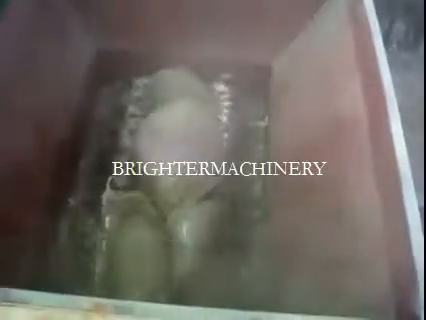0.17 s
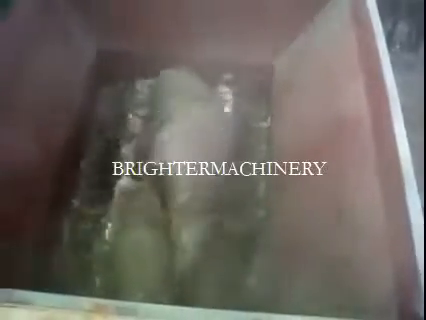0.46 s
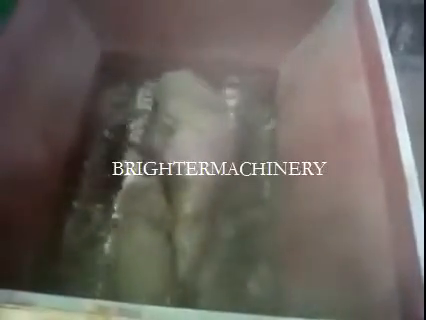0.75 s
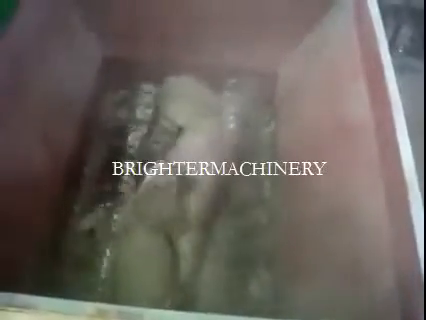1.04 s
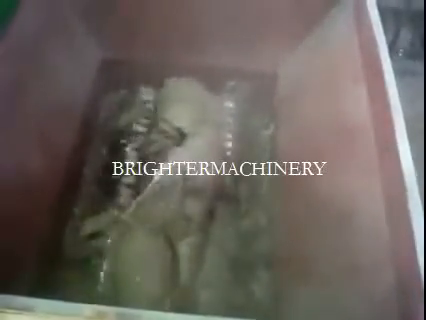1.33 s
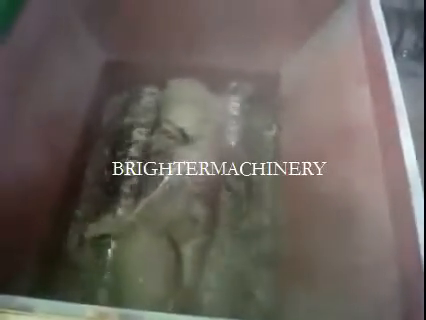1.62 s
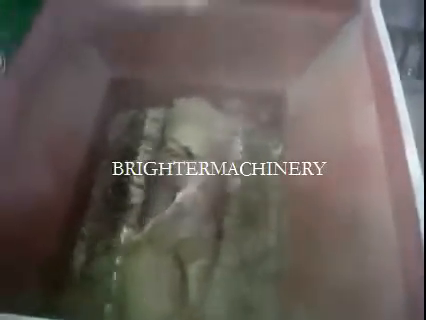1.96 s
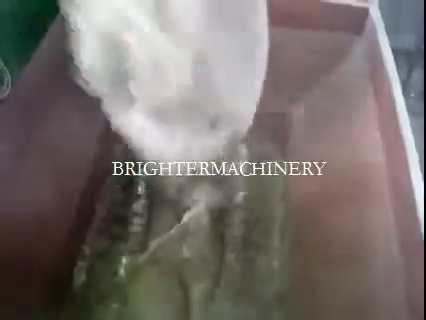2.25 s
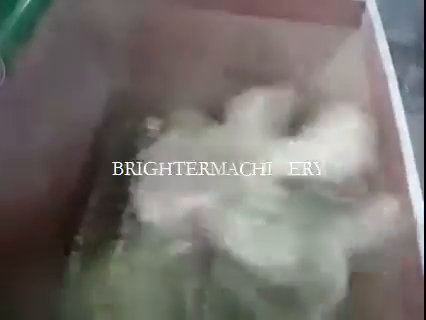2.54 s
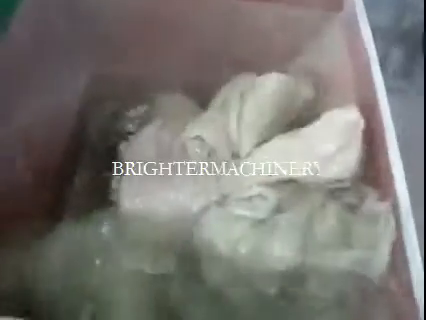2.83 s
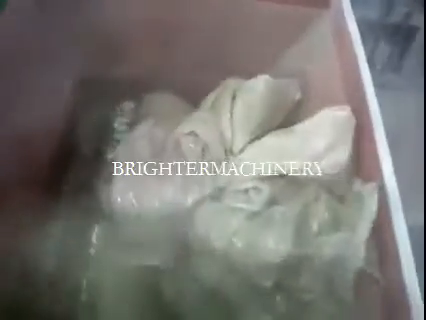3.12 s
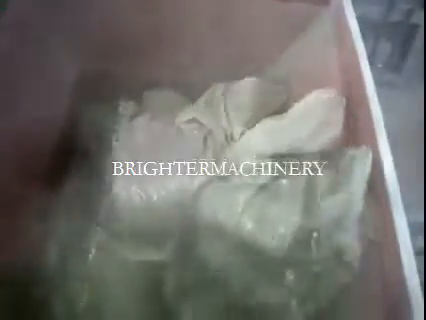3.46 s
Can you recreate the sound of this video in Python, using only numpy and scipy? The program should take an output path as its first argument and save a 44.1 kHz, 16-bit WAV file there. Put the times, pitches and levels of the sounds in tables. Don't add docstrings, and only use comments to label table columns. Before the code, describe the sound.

A heavy plastic shredder roars continuously with a low-mid, lumpy motor and gear hum. Knives crackle through film, scrap rattles on steel, chips ping, and irregular knocks and dull thuds strike throughout. A sharp crack comes near 2.05 s, then dense tearing around 2.4-2.6 s as a sack drops. From 2.7 s the cutting is duller, with a wavering hollow boom and faint air rumble. Close, compressed mono, short workshop echo; it ends still running.

```python
import sys
import numpy as np
from scipy import signal
from scipy.fft import rfft, irfft, next_fast_len
from scipy.io import wavfile
from scipy.ndimage import uniform_filter1d, map_coordinates

SR = 44100
rng = np.random.default_rng(int(sys.argv[2]) if len(sys.argv) > 2 else 0)


def store_wav(level_fs):
    pcm = np.round(np.clip(np.atleast_2d(level_fs), -1, 1) * 32767)
    wavfile.write(sys.argv[1], SR, pcm.T.astype(np.int16))


def how_loud(loudness_db):
    steps = np.asarray(loudness_db, float) / 20
    return 10 ** steps


N = 158319

# time in seconds, roar level in dB.
DRIVE_LOAD = [(0, -22.5), (.3, -22), (.7, -21.5), (1, -23.5), (1.5, -23), (2, -21.5), (2.1, -25.5),
              (2.4, -22), (2.53, -27), (2.7, -24.5), (3.1, -21.5), (3.59, -21.5)]
# frequency in Hz, level in dB.
ROAR_COLOUR = [(12, -56), (20, -50), (70, -23), (140, -5.5), (290, 2.5), (352, 0), (454, 2), (624, -5),
               (900, -14.5), (1170, -36.5), (1980, -120)]
# frequency in Hz, level in dB.
GEAR_HUM = [(300.7, -40), (385.7, -40.5), (448, -41.5), (156, -43.5)]
# time in seconds, shredding level in dB, rattle level in dB.
KNIFE_LEVELS = [(0, -27, -26.5), (.3, -26, -24), (.5, -25, -22.5), (.75, -24.5, -23), (1.02, -26.5, -22.5),
                (1.3, -26, -26.5), (1.6, -24.5, -22.5), (1.85, -24.5, -26), (1.97, -27, -23),
                (2.3, -26.5, -26), (2.5, -24.5, -21), (2.62, -26.5, -26), (2.76, -29, -26.5),
                (3.0, -26.5, -25.5), (3.17, -29, -23.5), (3.32, -25.5, -25), (3.59, -25.5, -25)]
# frequency in Hz, level in dB.
SHRED_COLOUR = [(760, -34), (1300, -3.0), (1640, -2), (2490, -5), (3040, -4.0), (3500, -6.5), (9500, -12),
                (12400, -27.5), (20900, -120), (22000, -30.5)]
# centre in Hz, width in Hz, level in dB.
HOPPER_PANELS = [(843, 288, 0), (1000, 290, 2), (1258, 242, -2)]
# time in seconds, level in dB.
DRAUGHT_LEVEL = [(0, -66), (.5, -63), (1.0, -68), (1.5, -64), (2.05, -67), (2.35, -54), (2.5, -65),
                 (2.65, -51), (3.0, -54.5), (3.2, -55), (3.45, -51), (3.59, -52)]
# time in seconds, level in dB, length in seconds, centre pitch in Hz.
FILM_TEARS = [(0.033, -31.5, 0.011, 4170), (0.1, -26.5, 0.023, 3330), (0.326, -23, 0.0059, 5960),
              (0.369, -24.5, 0.022, 5870), (0.566, -21, 0.021, 6200), (0.623, -25, 0.029, 5800),
              (0.734, -25, 0.025, 3220), (0.816, -27, 0.023, 3470), (0.938, -32, 0.02, 3600),
              (0.997, -23, 0.013, 4300), (1.087, -23.5, 0.016, 4800), (1.233, -25, 0.013, 6550),
              (1.398, -26.5, 0.065, 2910), (1.426, -26, 0.038, 6500), (1.758, -27.5, 0.017, 3080),
              (1.818, -28.5, 0.036, 3000), (1.861, -26.5, 0.011, 6350), (2.057, -11, 0.0078, 3590),
              (2.104, -29, 0.0097, 5930), (2.375, -22.5, .035, 4370), (2.417, -18.5, 0.031, 3170),
              (2.437, -26.5, 0.023, 2510), (2.487, -18.5, 0.022, 6140), (2.488, -20.5, 0.041, 1400),
              (2.511, -21.5, .025, 3240), (2.465, -26.5, 0.022, 3000), (2.573, -26.5, .035, 2490),
              (2.531, -18, 0.03, 2970), (2.521, -25.5, .04, 1210), (2.061, -21, 0.005, 1100),
              (0.302, -25.5, 0.045, 1000), (0.643, -26, 0.029, 950), (0.803, -26.5, .05, 955),
              (1.452, -29, 0.069, 790), (3.021, -25.5, 0.02, 6270), (3.079, -29.5, 0.066, 4380),
              (3.272, -25.5, 0.041, 6100), (3.374, -24, 0.032, 6040), (3.423, -22.5, 0.01, 2960)]
# time in seconds, peak
# level in dB, pitch in Hz.
WALL_KNOCKS = [(0.278, -5.5, 1000), (.412, -2, 1040), (0.734, -1.5, 976), (.789, -11, 930), (0.992, 0, 847),
               (.993, -6.5, 1820), (1.169, -7.5, 1000), (1.271, -3, 960), (1.494, -5, 964),
               (1.84, -3.5, 1000), (1.892, -11, 700), (2.008, -6, 490), (2.057, -3, 910), (2.411, -6, 943),
               (2.479, -11, 1660), (2.93, -7, 1000), (2.992, -8, 885), (3.074, -4, 870),
               (3.175, -6.5, 1033), (3.585, -7, 800), (0.036, -1.5, 4610), (0.721, -6, 3070),
               (.94, -6, 3540), (1.084, -3, 2094), (1.816, -7, 3010), (.72, -7.5, 1000), (.812, -6, 890),
               (1.081, -8.5, 923), (1.3, -9, 900), (2.029, -8.5, 452), (.235, -10, 3140),
               (.288, -9.5, 1530), (0.937, -14, 870), (1.201, -13, 2730), (1.75, -8.5, 2710),
               (2.238, -13, 1910), (2.851, -12, 1750), (3.421, -12, 1520), (2.043, -10.5, 812),
               (.55, -8.5, 1860), (2.019, -7, 2970), (2.03, -15, 2920)]
# time in seconds, peak level in dB, pitch in Hz.
ROTOR_THUDS = [(0.365, -7, 288), (0.441, -15, 290), (0.468, -7, 470), (0.707, -18, 337), (0.811, -10, 312),
               (0.843, -10, 400), (1.081, -8.5, 461), (1.119, -9.5, 330), (1.162, -10.5, 400),
               (1.269, -11.5, 460), (1.335, -12, 320), (1.402, -22, 263), (1.441, -15, 282),
               (1.512, -14, 310), (1.658, -9, 546), (1.712, -12, 442), (1.784, -13, 383), (1.85, -17, 328),
               (1.89, -10, 333), (2.004, -14.5, 524), (2.066, -23, 428), (2.246, -14, 431),
               (2.378, -19, 326), (2.402, -9, 456), (2.444, -16, 457), (2.473, -18, 465), (2.566, -10, 375),
               (2.659, -12, 257), (2.725, -19, 434), (2.906, -7, 328), (3.079, -9, 433), (3.251, -9, 364),
               (3.295, -12, 260), (3.376, -15, 390), (3.459, -8, 425), (3.512, -15, 403), (3.558, -17, 366)]
# frequency in Hz, time to fall by 60 dB in seconds.
ROOM_DECAY = [(200, 0.14), (2000, 0.88), (10000, 0.26)]
# time in seconds, level in dB, centre pitch in Hz.
SACK_BOOM = [(0, -55, 381), (2.5, -46.5, 379), (2.7, -31, 380), (2.82, -26.5, 380.6), (2.95, -31, 420),
             (3.1, -27.5, 435), (3.2, -27.5, 400.6), (3.28, -29.5, 370.2), (3.38, -25, 407.7),
             (3.45, -29.5, 467.7), (3.51, -28, 404.6), (3.59, -27, 374)]
# frequency in Hz, step over mean treble level in dB.
ROUNDING_STEP = [(100, 4), (1000, 11), (3000, 8), (6000, 7), (9000, 7.5), (10500, 7)]

SNAPS_PER_S, RATTLES_PER_S, PINGS_PER_S = 2500, 800, 120
PANEL_TOP_HZ, PANEL_STEEP = 1446, 8
PING_HZ, PING_SPREAD, PING_CYCLES, PING_DB = 1400, .6, 22, -32
TEAR_OCTAVES = .9
KNOCK_T60, KNOCK_SPREAD = .038, .09
KNOCK_DB, CRACK_DB, CRACK_T60 = 1, -9, 0.0066
THUD_T60, THUD_RISE_S, THUD_DB = 0.1, 0.0051, -4.5
ROOM_DB = -12.5
BOOM_WIDTH_HZ, BOOM_STEADY = 75, .7
DUCK_FROM_DB, DUCK_RATIO, DUCK_RELEASE_S = -20.5, 0.81, 0.024
MIC_TOP_HZ, MIC_STEEP = 10315, 16
CEILING, KNEE = .7, 6
STORE_TOP_HZ = 10470


def unit(x):
    return x / np.sqrt(np.mean(x ** 2) + 1e-20)


def along(points, hz):
    f, v = np.transpose(points)
    return np.interp(np.log(hz + 1), np.log(f + 1), v)


def curves(rows):
    s, *cols = np.transpose(rows)
    return [np.interp(np.arange(N) / SR, s, c) for c in cols]


def wobble(rate):
    points = rng.standard_normal(int(N * rate / SR) + 4)
    return map_coordinates(points, [np.arange(N) * rate / SR])


def filtered(x, response):
    m = next_fast_len(len(x) + 8192)
    spectrum = rfft(x, m) * response(np.fft.rfftfreq(m, 1 / SR))
    return irfft(spectrum, m)[:len(x)]


def patchy(depth_db):
    z = signal.stft(rng.standard_normal(N), nperseg=512)[2]
    field = uniform_filter1d(rng.standard_normal(z.shape), 8, 0)
    field = uniform_filter1d(field, 6, 1)
    return unit(signal.istft(z * how_loud(depth_db * unit(field)), nperseg=512)[1][:N])


def clicks(count, spread_db):
    when, luck, sign = rng.random((int(count * N / SR), 3)).T
    size_db = np.minimum(-spread_db * np.log(1 - luck), 3 * spread_db)
    size = np.sign(sign - .5) * how_loud(size_db)
    return unit(np.bincount((when * N).astype(int), size, N))


def drive():
    load_db, = curves(DRIVE_LOAD)
    roar = unit(filtered(patchy(depth_db=0.5), lambda hz: how_loud(along(ROAR_COLOUR, hz))))
    roar_db = load_db - 0.2 + 0.88 * wobble(12)
    t = np.arange(N) / SR
    tones = np.zeros(N)
    for hz, db in GEAR_HUM:
        level = how_loud(db + 1 + 3.6 * wobble(2.97))
        tones += level * np.sin(2 * np.pi * hz * t + 2.23 * wobble(6))
    return how_loud(roar_db) * roar + tones


def panels(f):
    total = 0
    for k, (centre, width, db) in enumerate(HOPPER_PANELS):
        ringing = 1j * f * width / (centre * centre - f * f + 1j * f * width)
        total = total + (-1) ** k * how_loud(db) * ringing
    return total / (1 + (f / PANEL_TOP_HZ) ** PANEL_STEEP)


def knives():
    shred_db, rattle_db = curves(KNIFE_LEVELS)
    pass_db = wobble(20) + 0.43 * wobble(11)
    snaps = .45 * clicks(count=SNAPS_PER_S, spread_db=2.5) + patchy(depth_db=2.01)
    shred = unit(filtered(snaps, lambda hz: how_loud(along(SHRED_COLOUR, hz))))
    scrap = .9 * clicks(count=RATTLES_PER_S, spread_db=3.0) + patchy(depth_db=1.86)
    rattle = unit(filtered(scrap, panels))
    shred_db = shred_db + 2.5 + 0.67 * pass_db
    rattle_db = rattle_db - 0.48 + 0.57 * pass_db + 0.68 * wobble(30.06)
    return how_loud(shred_db) * shred + how_loud(rattle_db) * rattle


def pings():
    draw = rng.standard_normal((int(PINGS_PER_S * N / SR), 2))
    at, t = rng.integers(0, N, len(draw)), np.arange(SR // 20) / SR
    hz = PING_HZ * np.exp(PING_SPREAD * draw[:, :1])
    envelope = np.exp(-t * hz / PING_CYCLES) * (1 - np.exp(-t / 0.0022))
    rings = how_loud(3.3 * draw[:, 1:]) * np.sin(2 * np.pi * hz * t) * envelope
    where = at[:, None] + np.arange(len(t))
    return how_loud(PING_DB) * unit(np.bincount(where.ravel(), rings.ravel())[:N])


def draught():
    level_db, = curves(DRAUGHT_LEVEL)
    low = filtered(rng.standard_normal(N), lambda hz: hz / (hz + 60) / (1 + (hz / 70) ** 4))
    return how_loud(level_db + 4.6 * wobble(7.3)) * unit(low)


def tears():
    out, t = np.zeros(N + SR), np.arange(-SR // 20, SR // 10) / SR
    source = 0.99 * clicks(count=SNAPS_PER_S, spread_db=2.5) + rng.standard_normal(N)
    for s, db, length, hz in FILM_TEARS:
        at = round(s * SR)
        band = lambda f: np.exp(-.5 * (np.log2((f + 1) / hz) / TEAR_OCTAVES) ** 2)
        grain = unit(filtered(np.roll(source, -at)[:len(t)], band))
        side = length * np.where(t < 0, 0.55, .8)
        swell = np.exp(-2 * (t / side) ** 2)
        out[at:at + len(t)] += how_loud(db) * swell * grain
    return out[SR // 20:][:N]


def knocks():
    out, t = np.zeros(N + SR), np.arange(SR // 10) / SR
    draw = rng.standard_normal((len(WALL_KNOCKS), 5))
    rough = np.gradient(uniform_filter1d(rng.standard_normal(len(t)), size=12)) * 5
    crack = how_loud(CRACK_DB - 60 * t / CRACK_T60) * rough
    for (s, db, hz), d in zip(WALL_KNOCKS, draw):
        ring = np.zeros(len(t))
        for k in range(5):
            mode_hz = hz * np.exp(KNOCK_SPREAD * (k - 2 + .3 * d[k]))
            ring += np.sin(2 * np.pi * mode_hz * t) / (1 + abs(k - 2)) / 2.2
        fade = how_loud(-60 * t / (KNOCK_T60 * np.sqrt(1000 / hz)))
        rise = 1 - np.exp(-t / 0.0014)
        out[round(s * SR):][:len(t)] += how_loud(db + KNOCK_DB) * (fade * rise * ring + crack)
    return out[:N]


def thuds():
    out, t = np.zeros(N + SR), np.arange(SR // 8) / SR
    rise = 1 - np.exp(-t / THUD_RISE_S)
    for s, db, hz in ROTOR_THUDS:
        fade = how_loud(db + THUD_DB - 60 * t / THUD_T60)
        out[round(s * SR):][:len(t)] += fade * rise * np.sin(2 * np.pi * hz * t)
    return out[:N]


def room(x):
    hz, t, z = signal.stft(rng.standard_normal(SR // 2), SR, nperseg=256)
    fade = how_loud(-60 * t / along(ROOM_DECAY, hz)[:, None])
    tail = signal.istft(z * fade, SR, nperseg=256)[1]
    late = np.pad(x, (300, 0))
    return signal.fftconvolve(late, tail / np.linalg.norm(tail))[:N]


def boom():
    level_db, hz = curves(SACK_BOOM)
    phase = 2 * np.pi * np.cumsum(hz) / SR
    air = (BOOM_STEADY + wobble(BOOM_WIDTH_HZ)) * np.sin(phase)
    air += wobble(BOOM_WIDTH_HZ) * np.cos(phase)
    return how_loud(level_db) * unit(air)


def scene():
    hits = tears() + knocks() + thuds()
    machine = drive() + knives() + pings() + boom()
    mono = machine + draught() + hits + how_loud(ROOM_DB) * room(hits)
    return np.array([mono, mono])


def camera_rounding(x, size=1024):
    n, k = np.arange(2 * size), np.arange(size) + .5
    hz = k * SR / (2 * size)
    window = np.sin(np.pi * (n + .5) / (2 * size))[:, None]
    waves = np.cos(np.pi / size * np.outer(n + .5 + size / 2, k))
    basis = window * waves * np.sqrt(2 / size)
    blocks = np.pad(x, (size, 2 * size - len(x) % size)).reshape(-1, size)
    lines = np.hstack([blocks[:-1], blocks[1:]]) @ basis
    treble = np.sqrt(np.mean(lines[:, size // 4:] ** 2, 1, keepdims=True) + 1e-12)
    step = how_loud(along(ROUNDING_STEP, hz) + rng.normal(0, 1.5, (len(lines), 1))) * treble
    rounded = np.sign(lines) * np.floor(np.abs(lines) / step + .4) * step
    back = (rounded * (hz < STORE_TOP_HZ)) @ basis.T
    return (back[:-1, size:] + back[1:, :size]).ravel()[:len(x)]


def low_pass(x):
    return signal.sosfilt(signal.butter(12, 10730, fs=SR, output="sos"), x)


def record(dry):
    sharp = filtered(dry[0], lambda hz: hz > 2000)
    power = np.abs(uniform_filter1d(sharp ** 2, 441, origin=220))
    over_db = np.maximum(10 * np.log10(power + 1e-9) - DUCK_FROM_DB, 0)
    keep = np.exp(-1 / (DUCK_RELEASE_S * SR))
    duck_db = signal.lfilter([1 - keep], [1, -keep], over_db)
    ducked = dry[0] * how_loud(-DUCK_RATIO * duck_db)
    mono = filtered(ducked, lambda hz: 1 / (1 + (hz / MIC_TOP_HZ) ** MIC_STEEP))
    mono = mono / (1 + np.abs(mono / CEILING) ** KNEE) ** (1 / KNEE)
    mono = camera_rounding(mono)
    return low_pass(np.array([mono, mono]))


dry = scene()
out = record(dry)
store_wav(out)
```